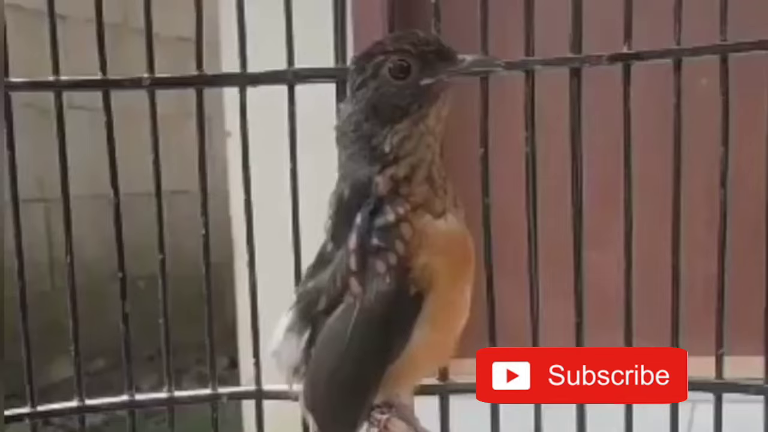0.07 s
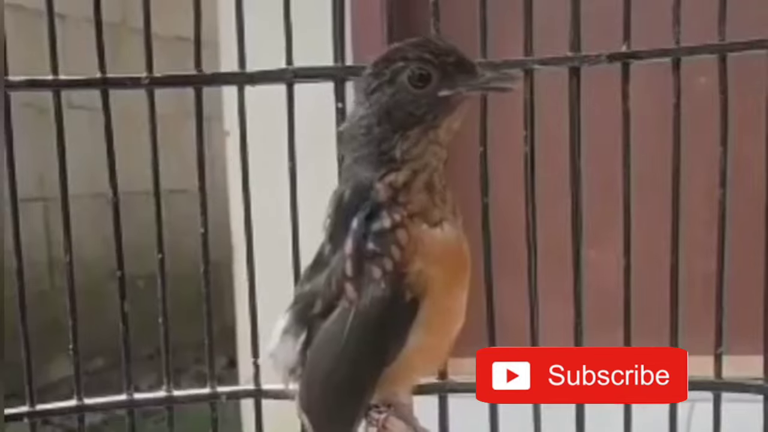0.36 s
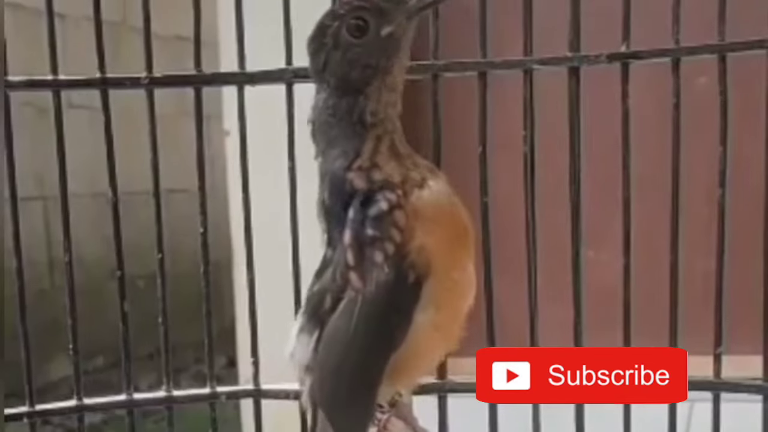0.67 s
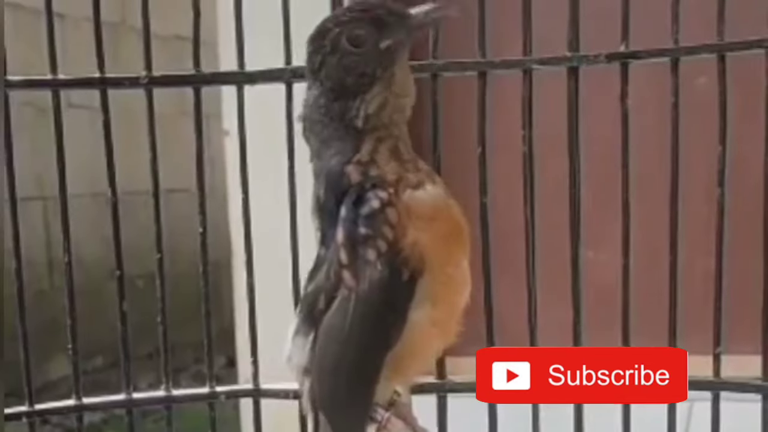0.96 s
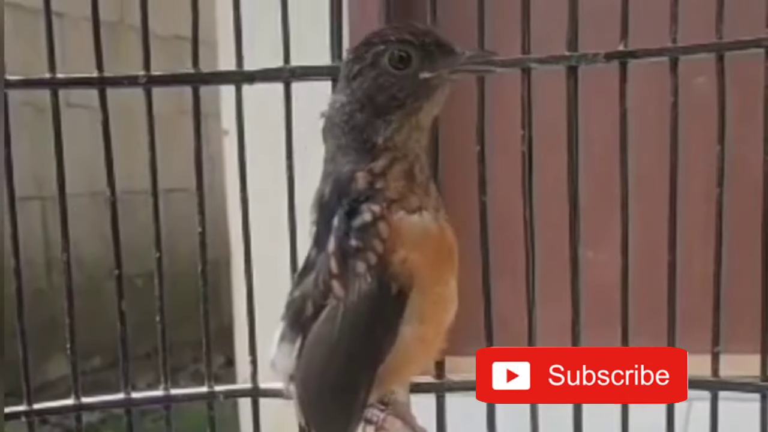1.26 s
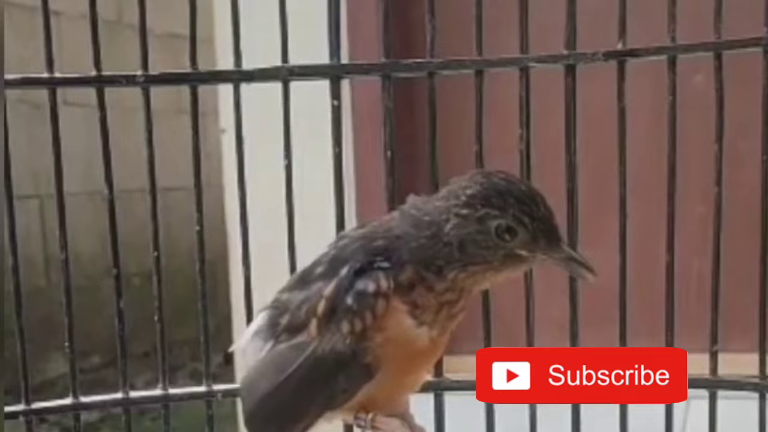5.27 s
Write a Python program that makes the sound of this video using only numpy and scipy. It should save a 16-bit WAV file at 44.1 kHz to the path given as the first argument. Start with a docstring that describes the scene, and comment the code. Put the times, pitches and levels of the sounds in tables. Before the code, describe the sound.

A caged songbird sings close by in rapid chirps, sliding whistles and harsh rasps, ringing in a room over a low hum.

```python
"""A white-rumped shama, a songbird, sings close by in a wire cage in a hard-walled room.
Both sides of its voice box (the syrinx) whistle sliding notes, at times two at once. Flapping
membranes add harsh rasps, and uneven puffs of air add scratchy swells. The room rings after
every note, over faint twittering, far whistles, soft rustles, a low hum and a thin hiss.
The loudest notes overload the recorder."""
import sys
import numpy as np
from scipy import signal
from scipy.fft import rfft, irfft, next_fast_len
from scipy.io import wavfile

SR = 44100
rng = np.random.default_rng(int(sys.argv[2]) if len(sys.argv) > 2 else 0)


def generate_wav(signal):
    """Clip the signal to [-1, 1] and save it as 16-bit WAV at the path in sys.argv[1]."""
    frames = np.transpose(np.atleast_2d(signal))
    scaled = np.clip(frames, -1, 1) * 32767
    pcm = np.round(scaled).astype(np.int16)
    wavfile.write(sys.argv[1], SR, pcm)


N = 270774

SETTLE_POWER = 2.05   # higher makes a slide reach its pitch sooner
ROUGH_FLUTTER_DB, ROUGH_OVERTONE_DB = 4.0, 8   # a fully rough note's level shake and extra overtone
LEFT_RIGHT = np.array([[.5], [-.5]])   # splits a difference evenly between the two ears


def from_db(db):
    """Turn decibels into a number to multiply a sound by."""
    return 10 ** (np.asarray(db) / 20)


def rms_one(x):
    """Scale a signal so its average power is 1."""
    return x / np.sqrt(np.mean(x ** 2) + 1e-20)


def in_time(rows):
    """Join (seconds, value) points with straight lines, giving a value for every sample."""
    return np.interp(np.arange(N) / SR, *np.transpose(rows))


def at_hz(points, hz, column=1):
    """Look up a table column at any frequency, with octaves evenly spaced."""
    points = np.array(points)
    return np.interp(np.log(np.maximum(hz, 1)), np.log(points[:, 0]), points[:, column])


def waver(size, rate_hz):
    """A smooth random wiggle, about 1 in size, that moves no faster than about rate_hz."""
    padded = size + SR // 10
    hz = np.fft.rfftfreq(padded, 1 / SR)
    spectrum = rfft(rng.standard_normal(padded)) / (1 + (hz / rate_hz) ** 4)
    return rms_one(irfft(spectrum))[:size]


def fade(size, edge_s):
    """A volume shape that opens and closes softly."""
    s = np.arange(size) / SR
    return np.sin(np.pi / 2 * np.clip(np.minimum(s, s[::-1]) / edge_s, 0, 1)) ** 2


def progress(length_s):
    """Count from 0 to 1 through a note."""
    return np.linspace(0, 1, int(length_s * SR))


def filtered(sound, kind, hz, order=2):
    """Keep the "low" part, the "high" part or one "band" of a sound."""
    return signal.sosfilt(signal.butter(order, hz, kind, fs=SR, output="sos"), sound + 1e-18)


def add(out, start_s, sound):
    """Mix a sound in at a given time."""
    i = int(start_s * SR)
    out[:, i:i + sound.shape[-1]] += sound[..., :N - i]


def steady_noise(spectrum):
    """Noise with a given tone colour, nearly the same in both ears in the bass."""
    # Each row: frequency in Hz, how alike the two ears are from 0 to 1.
    likeness = [(30, 0.93), (130, 1), (260, 0.97), (500, 0.63), (1000, 0.08), (2000, 0.024), (5000, 0.027),
                (9000, 0.11)]
    size = next_fast_len(N)
    hz = np.fft.rfftfreq(size, 1 / SR)
    mid, side = rfft(rng.standard_normal((2, size))) * from_db(at_hz(spectrum, hz))
    alike = at_hz(likeness, hz)
    ears = np.sqrt(1 + alike) * mid + np.sqrt(1 - alike) * side * [[1], [-1]]
    return rms_one(irfft(ears, size)[:, :N])


def hum(waver_db=1.5):
    """A low hum of noise whose level drifts gently."""
    # The hum's tone colour. Each row: frequency in Hz, relative strength in dB.
    colour = [(15, -47), (25, -20.5), (48, -4.5), (81, -11.5), (117, 0), (134, 1), (184, -2), (361, -18),
              (900, -18), (1170, -54), (1980, -120)]
    # The hum's loudness. Each row: time in seconds, level in dB.
    levels = [(0.2, -43), (0.5, -43.5), (1.52, -41), (1.9, -45), (1.99, -39), (2.22, -41.5), (2.47, -45),
              (3.69, -41.5), (5.15, -46), (6.14, -44.5)]
    return from_db(in_time(levels) + waver_db * waver(N, rate_hz=3.4)) * steady_noise(colour)


def hiss(delay_s=.0019, echo_db=-9):
    """A thin hiss, coloured by its echo off the wall behind the cage."""
    # The hiss's tone colour. Each row: frequency in Hz, relative strength in dB.
    colour = [(700, -10.5), (1200, 6), (2500, 9), (3500, 5), (4200, 8.5), (5200, 5), (6500, -5),
              (8000, -15), (10500, -13.5), (13000, -26.5), (15000, -71)]
    # The hiss's loudness. Each row: time in seconds, level in dB.
    levels = [(.2, -41), (1, -39.5), (2, -43.5), (2.5, -46.5), (3.1, -39), (3.8, -40.5), (4.6, -39),
              (5.3, -45.5), (6.1, -42)]
    noise = steady_noise(colour)
    echo = from_db(echo_db) * np.roll(noise, int(delay_s * SR), axis=1)
    return from_db(in_time(levels)) * rms_one(noise + echo)


def rustles(band_hz=(220, 900), waver_db=2):
    """Soft, dull rustles, likely the bird shifting on its perch."""
    # Each row is one rustle: start in seconds, length in seconds, level in dB.
    shuffles = [(0.62, 0.24, -53), (3.68, 0.2, -51)]
    out = np.zeros((2, N))
    for start, length, db in shuffles:
        size = int(length * SR)
        loudness = from_db(db + waver_db * waver(size, rate_hz=18)) * fade(size, length / 2)
        noise = rms_one(filtered(rng.standard_normal(size), "band", band_hz))
        add(out, start, loudness * noise)
    return out


def room(sound, build_s=0.013, shared=0.2, echoes_per_s=500, thicken_s=0.073, ear_spread=.06):
    """Hard walls add a few clear echoes, then scattered ones that thicken into a fading ring."""
    # The room's ring. Each row: frequency in Hz, seconds to fade by 60 dB, level in dB.
    ring = [(600, 0.46, -0.5), (1400, 0.29, -14), (2360, 0.31, -7), (3150, 0.25, -8), (4300, 0.51, -15.5),
            (6600, 0.29, -3.5), (14100, 0.34, -11)]
    # Echoes off the walls, near to far. Each row: delay in seconds, level in dB.
    walls = [(.0031, -22), (.0074, -9.5), (0.013, -12), (.021, -19), (.033, -23.5), (.052, -26)]
    s = np.arange(int(SR * .7)) / SR
    edges_hz = 500 * 2 ** np.arange(0, 5.1, .5)   # bands half an octave wide
    density = np.minimum(echoes_per_s * (1 + (s / thicken_s) ** 2) / SR, 1)
    response = np.zeros((2, len(s)))
    for low, high in zip(edges_hz, edges_hz[1:]):
        hz = np.sqrt(low * high)
        signs = rng.choice([-1, 1], (3, len(s)))
        arrivals = rng.random((3, len(s))) < density
        both_ears, *each_ear = signs * arrivals / np.sqrt(density)
        echoes = np.sqrt(shared) * both_ears + np.sqrt(1 - shared) * np.array(each_ear)
        band = filtered(echoes, "band", [low, high])
        decay = from_db(-60 * s / at_hz(ring, hz)) * np.minimum(s / build_s, 1) ** 2
        response += from_db(at_hz(ring, hz, column=2)) * band * decay / np.sqrt(np.sum(decay ** 2))
    for delay, db in walls:
        for ear, side in zip(response, (-1, 1)):   # early on the left, late on the right
            ear[int(delay * SR * (1 + side * ear_spread))] += from_db(db)
    return sound + signal.fftconvolve(sound, response, axes=1)[:, :N]


def microphones(sound):
    """The two microphones sit apart, so each wave reaches them out of step."""
    # Each row: frequency in Hz, how far the left side is ahead in radians.
    left_lead = [(200, 0.15), (1250, 0.97), (1700, 2.5), (1860, 1.67), (1980, 4.18), (2150, 0.14),
                 (2450, 2.36), (2700, 1.34), (3000, 3.2), (3500, 2.32), (4000, 4.72), (4600, 4.26),
                 (16000, 18.3)]
    size = next_fast_len(N + SR // 2)
    lead = at_hz(left_lead, np.fft.rfftfreq(size, 1 / SR))
    return irfft(rfft(sound, size) * np.exp(1j * lead * LEFT_RIGHT), size)[:, :N]


def twitter(per_s=140, low_hz=3800, high_hz=5500, length_s=.02, glide=.06, spread_db=3.5, pan_db=7):
    """Faint high chirps at random pitches, heard only as a chatter off the walls."""
    # The twittering's loudness. Each row: time in seconds, level in dB.
    levels = [(.2, -51), (1, -45), (2.5, -57), (3.05, -46), (3.5, -36.5), (4.1, -39.5), (4.7, -40),
              (5.4, -52), (6.1, -48)]
    chirps = np.zeros((2, N))
    for start in np.arange(0, N / SR - .05, 1 / per_s):
        late, height, stretch = rng.random(3)
        bend, strength, side = rng.standard_normal(3)
        u = progress(length_s * (.5 + stretch))
        path_hz = (low_hz + (high_hz - low_hz) * height) * (1 + glide * bend * u)
        chirp = np.sin(2 * np.pi * np.cumsum(path_hz) / SR) * np.sin(np.pi * u)
        ears = from_db(spread_db * strength + pan_db * side * LEFT_RIGHT)
        add(chirps, start + late / per_s, ears * chirp)
    echoes_only = room(chirps) - chirps
    return from_db(in_time(levels)) * rms_one(microphones(echoes_only))


def far_whistles(wobble=.002):
    """Thin, pure notes near one high pitch, likely another bird further off."""
    # Each row is one note: start in seconds, length in seconds, pitch in Hz, level in dB.
    notes = [(.77, .07, 5130, -35), (2.54, .055, 5130, -48), (2.635, .04, 5080, -44),
             (2.8, .055, 5130, -44), (2.87, .18, 5110, -38), (3.08, .09, 5020, -38)]
    out = np.zeros((2, N))
    for start, length, hz, db in notes:
        size = int(length * SR)
        pitch_hz = hz * (1 + wobble * waver(size, rate_hz=25))
        tone = np.sin(2 * np.pi * np.cumsum(pitch_hz) / SR)
        add(out, start, from_db(db) * tone * fade(size, length / 4))
    return out


def scratches(width=1.153, drift_db=-0.5, crackle_db=3.5, wide_db=-17, sizzle_hz=10600):
    """Chaotic shaking in the throat: crackling puffs ring in one band, with wide noise and sizzle."""
    # Each row is one scratchy swell: start in seconds, length in seconds, centre in Hz,
    # level in dB, sizzle in dB compared with the throat's ring.
    swells = [(0.315, 0.079, 3850, -25.5, -22.5), (0.661, 0.12, 6160, -37, -17),
              (0.876, 0.028, 4680, -33, -9.5), (0.955, 0.037, 5100, -27, -17),
              (0.998, 0.081, 4380, -30, -21.5), (1.278, 0.033, 4300, -49, -8),
              (1.435, 0.063, 5670, -38.5, -21), (1.761, 0.037, 5350, -30.5, -18),
              (1.837, 0.031, 4530, -37, -14.5), (1.897, 0.075, 4260, -25, -29),
              (1.955, 0.092, 5700, -40.5, -12.5), (3.085, 0.039, 4530, -42.5, -10.5),
              (3.222, 0.1, 3870, -30.5, -27), (3.365, .11, 4300, -33, -16.5),
              (3.515, 0.042, 4500, -36, -33.5), (3.625, 0.055, 4200, -31.5, -30),
              (3.745, 0.055, 5600, -40.5, -12), (4.003, 0.14, 4330, -44, -24),
              (4.546, 0.041, 4740, -30.5, -16.5), (4.944, .1, 5750, -42.5, -15),
              (5.774, 0.12, 3740, -26.5, -25.5), (5.862, .04, 4450, -22.5, -25),
              (6.012, 0.043, 4130, -24.5, -34), (6.053, 0.063, 5410, -31.5, -22)]
    out = np.zeros((2, N))
    for start, length, hz, db, sizzle_db in swells:
        size = int(length * SR)
        air = rng.standard_normal(size)
        air *= from_db(drift_db * waver(size, rate_hz=17) + crackle_db * waver(size, rate_hz=330))
        throat = rms_one(filtered(air, "band", [hz / width, hz * width]))
        wide = rms_one(filtered(air, "band", [900, 6500]))
        sizzle = rms_one(filtered(air, "band", [sizzle_hz / width, sizzle_hz * width]))
        noise = throat + from_db(wide_db) * wide + from_db(sizzle_db) * sizzle
        add(out, start, from_db(db) * noise * fade(size, length / 2))
    return filtered(out, "low", 12000, order=8)


def rasps(jitter=0.068, third_db=-19, edge_s=0.006):
    """The voice box's membranes flap unevenly, smearing pitch and overtones into a harsh band."""
    # Each row is one rasp: start in seconds, length in seconds, pitch in Hz, level in dB,
    # octave overtone in dB compared with the main tone.
    notes = [(0.186, 0.015, 1919, -19, -13), (1.161, 0.02, 1173, -20.5, 3.5),
             (1.283, 0.032, 1516, -20.5, -21), (1.477, 0.011, 1355, -17, 0), (2.024, 0.027, 1115, -26.5, 5),
             (2.226, 0.0096, 1830, -19.5, -15), (2.239, 0.016, 1233, -22, 3.5),
             (2.242, 0.027, 1655, -22.5, -17.5), (4.016, 0.012, 2010, -34.5, 4)]
    out = np.zeros((2, N))
    for start, length, hz, db, octave_db in notes:
        size = int(length * SR)
        phase = 2 * np.pi * np.cumsum(hz * (1 + jitter * waver(size, rate_hz=340))) / SR
        overtones = from_db(octave_db) * np.sin(2 * phase) + from_db(third_db) * np.sin(3 * phase)
        flutter = rms_one(from_db(ROUGH_FLUTTER_DB * waver(size, rate_hz=220)))
        add(out, start, from_db(db) * (np.sin(phase) + overtones) * fade(size, edge_s) * flutter)
    return filtered(out, "high", 900, order=4)


def swell(u, peak, rise_db=22.5, fall_db=16):
    """The push of air grows, then sinks as u goes from 0 to 1; given in dB, with 0 at the peak."""
    peak = np.clip(peak, .05, .95)
    rising = rise_db * (1 - u / peak) ** 2
    falling = fall_db * ((u - peak) / (1 - peak)) ** 2
    return -np.where(u < peak, rising, falling)


def slide(first_hz, last_hz, u, sag=0.024):
    """A pitch that moves fast, levels off, then droops as the air runs out."""
    return (last_hz + (first_hz - last_hz) * (1 - u) ** SETTLE_POWER) * (1 - sag * u ** 6)


def syrinx(path_hz, effort_db, overtones, rough, jitter=0.0087, shimmer_db=2.5, top_hz=6000):
    """The voice box sings a tone; slapping membranes add overtones, given as (pitch multiple, dB)."""
    # Each microphone favours different pitches. Each row: pitch in Hz, left minus right in dB.
    balance = [(1200, -1.5), (1650, -3.5), (1850, -3), (2050, -4.5), (2250, 10), (2520, 3.5), (2720, 6),
               (3000, -4), (3500, 0), (4400, -3.5), (5500, -3)]
    size = len(path_hz)
    rough = np.clip(rough, 0, 1)
    # Roughness and hard slaps shake the pitch, and no note holds quite still.
    flutter = (jitter + .026 * rough) * waver(size, rate_hz=260)
    slaps = .012 * min(from_db(overtones[0][1]), 1) * waver(size, rate_hz=570)
    wobble = .009 * waver(size, rate_hz=55)
    pitch_hz = path_hz * (1 + flutter + slaps + wobble)
    phase = 2 * np.pi * np.cumsum(pitch_hz) / SR
    buzz = sum(from_db(db) * np.sin(k * phase) / np.hypot(1, (k * pitch_hz / top_hz) ** 4)
               for k, db in overtones)   # overtones fade above top_hz
    shake_db = shimmer_db * waver(size, rate_hz=42)
    shake_db += rough * ROUGH_FLUTTER_DB * waver(size, rate_hz=200)
    gate = fade(size, edge_s=0.0011 + 0.027 * size / SR)
    loudness = from_db(effort_db) * rms_one(from_db(shake_db)) * gate
    crackle = rms_one(1 + .45 * waver(size, rate_hz=63))   # overtones come and go with the slaps
    ears = from_db(at_hz(balance, path_hz) * LEFT_RIGHT)
    ears /= np.sqrt(np.mean(ears ** 2, axis=0))
    full_effort = from_db(4.5 - 4.5 * np.log2(pitch_hz / 1800))   # the bird is less loud high up
    return np.minimum(ears * loudness, full_effort) * (np.sin(phase) + buzz * crackle)


def two_voices(one, other, coupling_db=-2.0):
    """When both sides of the voice box sound, each shakes the other and makes extra tones."""
    extra_tones = filtered(one * other, "high", 1300, order=4)
    return one + other + from_db(coupling_db) * extra_tones


def beak(song, cut_hz=8500, leak_db=-17):
    """The throat and beak let little through above the song's range."""
    return filtered(song, "low", cut_hz, order=4) + from_db(leak_db) * song


def nasal_calls(level_db=-3.5, third_db=-7, fourth_db=-12, between_db=-9):
    """Low slides rich in overtones; slaps that are strong and weak in turn add faint tones between."""
    # Each row is one call: start and length in seconds, first and last pitch in Hz, relative level
    # in dB, place of the peak from 0 to 1, octave overtone in dB compared with the main tone.
    notes = [(0.893, 0.027, 2230, 1670, -18.5, 0, -7.5), (1.465, 0.047, 1431, 1069, -16, 0.04, -8),
             (2.027, 0.064, 1022, 1445, -19.5, 0.2, -12.5), (2.667, 0.062, 1303, 1526, -27.5, 0, -10),
             (2.997, 0.12, 1463, 1795, -18.5, 0.53, -13), (3.111, 0.06, 1602, 1672, -16, 0.1, -6.5),
             (3.212, 0.096, 1170, 2333, -13, 0.6, -6), (3.374, 0.086, 1151, 1809, -21.5, 0.62, 1),
             (3.524, 0.057, 1153, 1725, -20.5, 0.98, -4), (3.769, 0.035, 1468, 1983, -18.5, 0.2, -9),
             (3.887, 0.067, 1273, 1812, -16.5, 0.9, -24.5), (5.799, 0.043, 1698, 2062, -17.5, 0.1, -9.5),
             (5.832, 0.021, 2158, 1653, -18, 0.7, -3.5), (5.864, 0.027, 1718, 2870, -17, 0.29, 2),
             (6.027, 0.027, 2599, 1360, -22.5, 0.4, 6), (6.051, 0.024, 1470, 1977, -27, 0.7, 1.5)]
    stack = [(2, 0), (3, third_db), (4, fourth_db), (1.5, between_db), (2.5, between_db)]
    out = np.zeros((2, N))
    for start, length, first_hz, last_hz, db, peak, octave_db in notes:
        u = progress(length)
        overtones = [(k, octave_db + offset_db) for k, offset_db in stack]
        path_hz = slide(first_hz, last_hz, u)
        add(out, start, syrinx(path_hz, db + level_db + swell(u, peak), overtones, rough=.3))
    return out


def sweeps(level_db=-0.5, octave_db=-26, plunge_power=1.8, kink=.035):
    """Sharp, slightly broken chirps whose pitch drops faster and faster."""
    # Each row is one chirp: start and length in seconds, first and last pitch in Hz,
    # relative level in dB, place of the peak from 0 to 1.
    notes = [(0.612, 0.034, 4310, 2500, -14, 0.79), (0.759, 0.04, 3700, 2526, -10, 0.43),
             (0.882, 0.022, 5040, 3380, -5, 0.5), (0.953, 0.026, 6156, 3135, -4, 0.94),
             (1.238, 0.041, 2226, 994, -10, 0.06), (1.472, 0.032, 2630, 1382, -12, .9),
             (1.612, 0.025, 4256, 2560, -1.5, 1), (1.678, 0.033, 4910, 3160, -12, 0.94),
             (1.749, 0.031, 5280, 2516, -7.5, 0.95), (1.829, 0.021, 5795, 3237, -9, 0.97),
             (1.896, 0.013, 5900, 5600, -23, .5), (1.909, 0.015, 5680, 3490, -14.5, 0.9),
             (4.989, 0.11, 5480, 3980, -31.5, 1), (5.529, 0.04, 3120, 2127, -20, 0.93),
             (5.84, 0.02, 4486, 3180, -16, 0.6), (6.022, .03, 5160, 3000, -17, 0.7)]
    out = np.zeros((2, N))
    for start, length, first_hz, last_hz, db, peak in notes:
        u = progress(length)
        path_hz = first_hz + (last_hz - first_hz) * u ** plunge_power
        path_hz *= 1 + kink * waver(len(u), rate_hz=110)
        add(out, start, syrinx(path_hz, db + level_db + swell(u, peak), [(2, octave_db)], rough=.42))
    return out


def hooks(overtone_db=-36):
    """Hooked notes slide to one pitch, turn sharply and slide to another."""
    # Each row is one note: start and length in seconds, first, turning and last pitch in Hz, place
    # of the turn from 0 to 1, level in dB, place of the peak from 0 to 1, roughness from 0 to 1.
    notes = [(2.628, 0.069, 2810, 2493, 2650, 0.6, -14, 0.2, 0.4),
             (2.696, 0.077, 2892, 2568, 2776, .68, -12, 0.3, 0.2),
             (2.842, 0.068, 2907, 2680, 2770, 0.4, -16, 0.6, 0.8),
             (3.268, 0.029, 3218, 3243, 2933, 0.6, -6, 0.5, 0.3),
             (3.78, 0.04, 2630, 2828, 2656, 0.4, -6, 0.54, 0.3),
             (4.058, 0.15, 1885, 2010, 1980, .72, -13, .35, 0),
             (4.281, 0.05, 1437, 1733, 1744, 0.4, -8, 0.57, .05),
             (4.369, .05, 2190, 2726, 2306, 0.2, -7.5, 0.53, .5),
             (4.561, 0.041, 1301, 1728, 1640, .78, -1.5, 0.64, 0.2),
             (4.662, 0.046, 1534, 2246, 2054, 0.7, -6, .5, 0.21),
             (4.903, 0.039, 1706, 1781, 2022, 0.4, -2, 0.55, .15),
             (4.99, 0.054, 1375, 1600, 1522, .6, -13, .55, 0),
             (5.122, 0.049, 1750, 1864, 1831, 0.44, -3.5, 0.3, 0.04),
             (5.318, 0.047, 1490, 1674, 1616, 0.8, -9.5, 0.5, 0)]
    out = np.zeros((2, N))
    for start, length, first_hz, turn_hz, last_hz, turn, db, peak, rough in notes:
        u = progress(length)
        first_slide = (first_hz - turn_hz) * np.maximum(1 - u / turn, 0) ** SETTLE_POWER
        second_slide = (turn_hz - last_hz) * np.minimum((1 - u) / (1 - turn), 1) ** SETTLE_POWER
        path_hz = last_hz + first_slide + second_slide
        overtones = [(1.6, overtone_db + ROUGH_OVERTONE_DB * rough)]
        add(out, start, syrinx(path_hz, db + swell(u, peak), overtones, rough))
    return out


def whistles(level_db=-1.0, octave_db=-36):
    """Notes that slide quickly and settle on a pitch, from pure to hoarse."""
    # Each row is one note: start and length in seconds, first and last pitch in Hz, relative level
    # in dB, place of the peak from 0 to 1, roughness (0 is pure, 1 or more is hoarse).
    notes = [(0.282, 0.029, 2600, 2280, -24, 1, 0), (0.306, 0.019, 1666, 1570, -12, .2, 0.4),
             (0.339, 0.056, 1775, 2312, -11.5, 0.1, 0.4), (0.5, 0.12, 1690, 2496, -20.5, 0.2, 0),
             (0.662, 0.022, 2323, 2587, -12, 0.9, 0.5), (0.691, 0.0081, 2955, 2730, -4, 0.6, 0),
             (0.742, 0.019, 4140, 4120, -8, 0.7, 0.04), (0.801, 0.038, 2413, 2657, -6.5, 0, 0),
             (1.018, 0.042, 2450, 3650, -12, 0, 1.3), (1.21, 0.042, 2265, 2220, -6, 0.4, 0.1),
             (1.279, .036, 919, 2254, -8, 0.58, 0.4), (1.34, 0.027, 1204, 1414, -20, 0.6, 0.8),
             (1.514, 0.051, 1846, 2394, -12, 0.8, 0.2), (1.553, 0.014, 2910, 2578, -2.5, 0.17, 0),
             (1.846, 0.019, 3560, 3420, -8.5, 0, 0.2), (1.919, .02, 3120, 2526, -15, 0, 0.7),
             (2.283, 0.027, 2670, 3034, -21.5, 0.3, 0.5), (2.3, 0.033, 1745, 1834, -2, 0.1, 0.07),
             (2.381, 0.075, 2019, 1770, -12.5, 0.21, 0.3), (2.751, 0.06, 1927, 1693, -15, 0.2, 0.1),
             (2.78, 0.068, 2780, 2753, -11.5, 0.55, 0.5), (2.833, 0.081, 1848, 1742, -18, 0.3, 0),
             (2.994, 0.067, 2644, 2920, -17, 0.3, 0.6), (3.047, 0.066, 2950, 3315, -20.5, 0.4, 1.1),
             (3.101, 0.034, 3457, 3342, -11.5, 0.8, 0.7), (3.126, 0.025, 3190, 2876, -15.5, 0.6, 0.7),
             (3.216, 0.015, 2650, 2850, -18.5, 0.9, 0.8), (3.3, 0.02, 2860, 2836, -8, 0.3, 0.2),
             (3.391, 0.062, 2438, 3010, -13.5, 0.5, 1.3), (3.537, 0.044, 2720, 2658, -7.5, 0.7, .1),
             (3.585, 0.055, 2600, 2750, -9, 0.3, 0), (3.631, 0.04, 3140, 2880, -12, 0, 1.1),
             (3.639, 0.086, 2090, 1960, -13, 0.2, 0.4), (3.93, 0.055, 2610, 2943, -17, 0.5, 0.8),
             (4.019, .115, 2790, 3010, -19.5, 0.3, 1.2), (4.442, 0.022, 2640, 2453, -11.5, 0.5, 0.6),
             (4.462, 0.038, 2254, 1825, -9, 0.6, 0.25), (4.785, 0.041, 1825, 1674, -7.5, 0.6, 0.05),
             (4.839, 0.02, 1630, 1689, -6.5, 0.5, 0), (4.943, 0.07, 2084, 2105, -11.5, 0.2, 0),
             (5.22, 0.032, 1696, 1885, -12.5, 0.45, 0.3), (5.351, 0.012, 2700, 2354, -22, 0.8, 0.6),
             (5.384, 0.017, 1660, 1832, -17.5, 0.4, 0), (5.547, 0.082, 1673, 2053, -20.5, 0.3, 0.2),
             (5.871, 0.014, 4700, 4205, -0.5, 0.5, 0.5), (6.08, 0.048, 4340, 4340, -15.5, 0.4, .6),
             (6.081, 0.024, 3650, 3595, -11.5, 0.2, 0.6)]
    out = np.zeros((2, N))
    for start, length, first_hz, last_hz, db, peak, rough in notes:
        u = progress(length)
        path_hz = slide(first_hz, last_hz, u)
        overtones = [(2, octave_db + ROUGH_OVERTONE_DB * rough)]
        add(out, start, syrinx(path_hz, db + level_db + swell(u, peak), overtones, rough))
    return out


def scene():
    """The bird in its room, over far whistles, twittering, hum, hiss and rustles."""
    scratchy = scratches()
    song = two_voices(whistles() + hooks(), nasal_calls()) + sweeps() + rasps()
    bird = microphones(room(beak(song) + scratchy))
    return bird + far_whistles() + twitter() + hum() + hiss() + rustles()


def record(dry, start_s=0.17, fade_in_s=0.054, clip_level=.95, stop_hz=16800):
    """The recorder opens after a moment, flattens the loudest peaks and cuts the highest treble."""
    opened = np.clip((np.arange(N) / SR - start_s) / fade_in_s, 0, 1)
    clipped = opened * np.clip(dry, -clip_level, clip_level)
    treble_cut = signal.cheby2(12, 50, stop_hz, fs=SR, output="sos")
    return signal.sosfiltfilt(treble_cut, clipped)


dry = scene()
out = record(dry)
generate_wav(out)
```